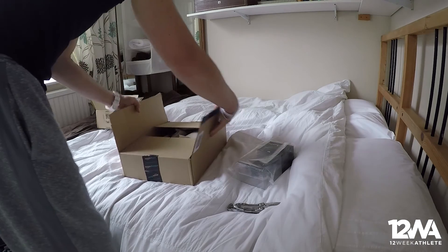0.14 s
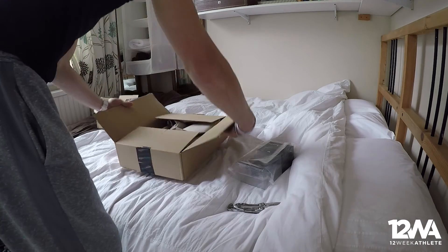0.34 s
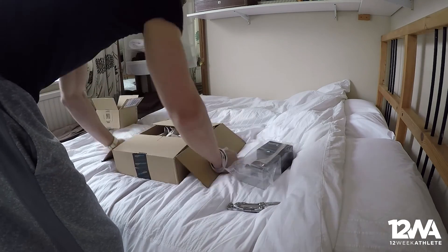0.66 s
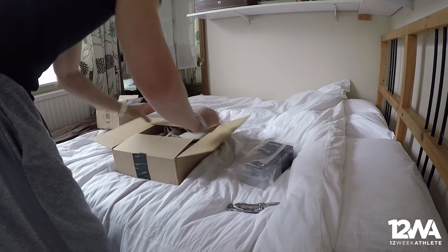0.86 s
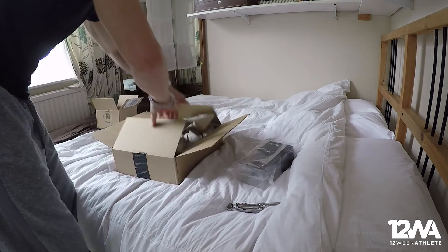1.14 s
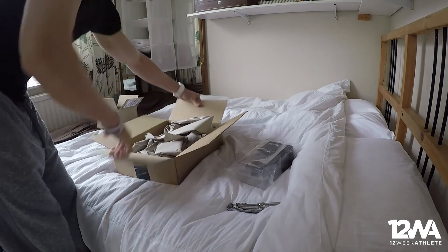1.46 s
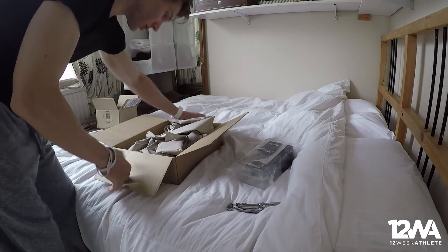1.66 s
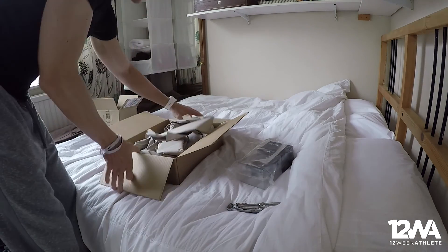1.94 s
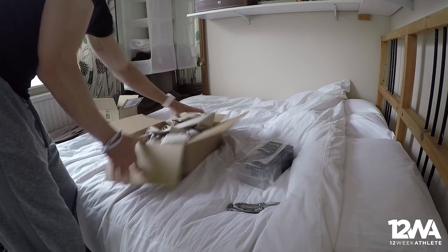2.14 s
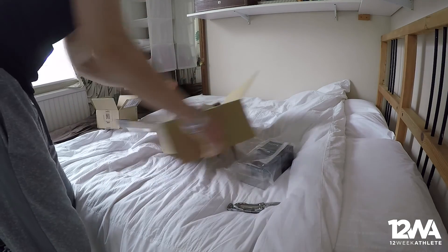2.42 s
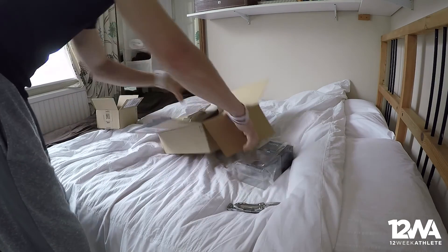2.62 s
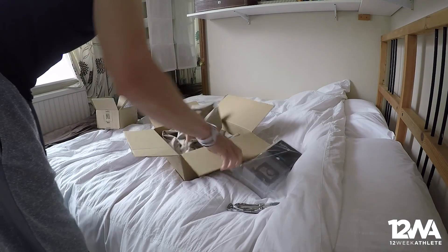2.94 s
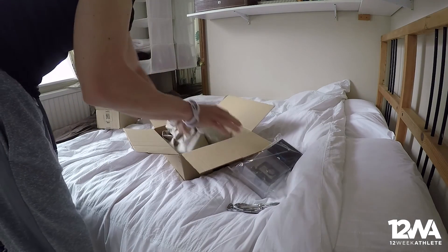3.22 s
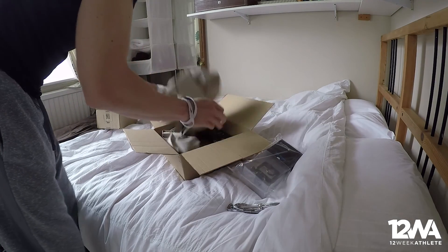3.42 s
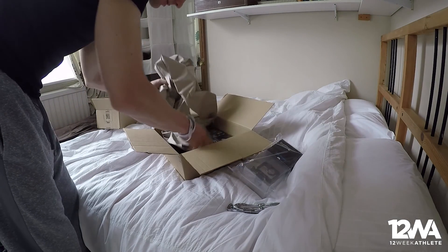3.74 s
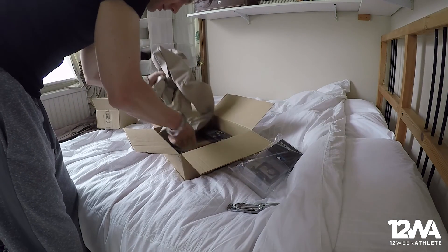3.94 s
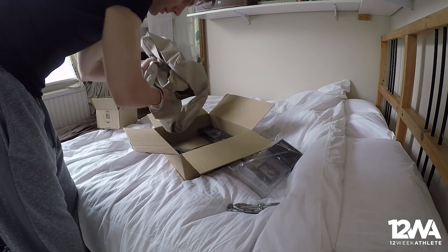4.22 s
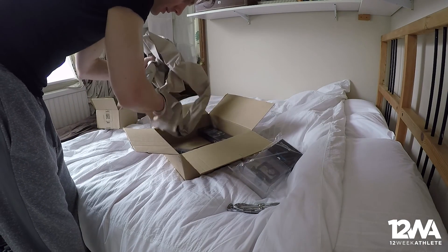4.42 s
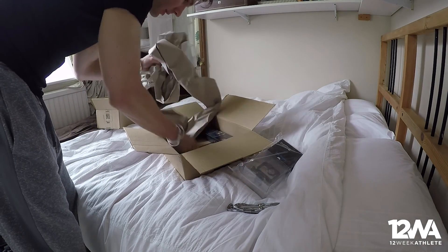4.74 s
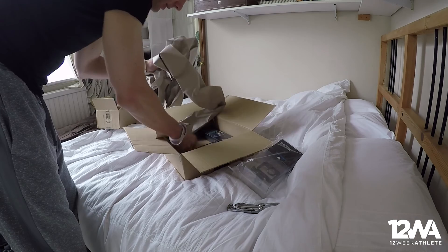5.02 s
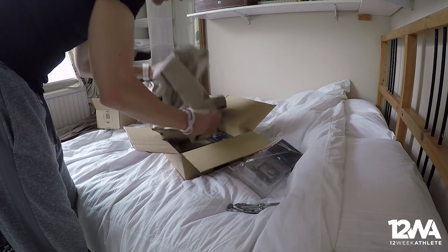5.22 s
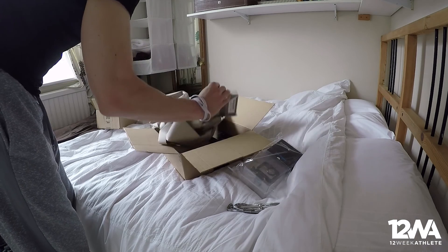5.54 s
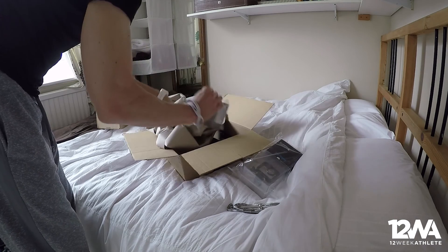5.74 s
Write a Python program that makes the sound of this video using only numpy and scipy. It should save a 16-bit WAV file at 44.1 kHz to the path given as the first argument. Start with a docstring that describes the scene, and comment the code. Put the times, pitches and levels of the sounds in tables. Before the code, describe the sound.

A cardboard box is opened on a bed in a quiet small bedroom, heard close and in mono with short, damped reflections. At about 0.15 s a flap knocks with a snap and a deep, soft mattress thump. From 0.4 to 0.8 s a flap scrapes dryly, with brief high squeaks and one lower creak. Between 1.0 and 2.3 s hollow knocks, snaps and gritty slides come irregularly, over low rumbling shoves and bounces. Lighter bumps follow from 2.4 s. Around 2.7 s stiff packing paper starts to crunch, densest and loudest near 3.1 s, with another burst around 3.5 s. It thins, then sharp creases pop from 4.0 to 4.4 s; box knocks and a low bump come near 4.75 s. A strong crackle burst at 5.3 to 5.4 s leads into continuing rustle to the end. Faint air, hiss and a thin steady high whine remain throughout.

```python
"""Opening a box and pulling out packing paper

A cardboard box is opened on a bed in a small bedroom: sliding flaps hiss, squeak, snap and knock.
Then crumpled paper crackles: tiny ringing grains come in bursts, mixed with filtered sliding noise.
Knocks are decaying tones and noise; shoves and bounces on the mattress make a low rumble.
Filtered noise and three steady high tones add the quiet room air, a faint hiss and a whine."""
import sys
import numpy as np
from scipy import signal
from scipy.fft import rfft, irfft
from scipy.io import wavfile
from scipy.ndimage import uniform_filter1d

SR = 44100
rng = np.random.default_rng(int(sys.argv[2]) if len(sys.argv) > 2 else 0)


def store_wav(level_fs):
    """Save 16-bit WAV to argv[1]."""
    pcm = np.round(np.clip(np.atleast_2d(level_fs), -1, 1) * 32767)
    wavfile.write(sys.argv[1], SR, pcm.T.astype(np.int16))


N = 258911  # length in samples


def from_db(db):
    """Turn decibels into a gain."""
    return 10 ** (np.asarray(db) / 20)


def rms_one(x):
    """Scale a sound to an average (rms) level of one."""
    return x / np.sqrt(np.mean(x ** 2) + 1e-20)


def decay(t, t60_s):
    """Gain that falls by 60 dB in t60_s."""
    return from_db(-60 * t / t60_s)


def band(x, low_hz, high_hz, order=3):
    """Keep only the pitches between two limits (Butterworth filter)."""
    sos = signal.butter(order, [low_hz, high_hz], "band", fs=SR, output="sos")
    return signal.sosfilt(sos, x + 1e-18)


def colour(x, points):
    """Shape a sound's spectrum through (pitch_hz, level_db) points, without sound ahead of its cause."""
    size = 16384
    hz, db = np.transpose(points)
    bins_hz = np.arange(size // 2 + 1) * SR / size
    log_gain = np.log(from_db(np.interp(np.log(bins_hz + 1), np.log(hz), db)))
    # folding the cepstrum makes the filter minimum-phase
    cepstrum = irfft(log_gain)[:size // 2]
    cepstrum[1:] *= 2
    response = irfft(np.exp(rfft(cepstrum, size)))
    return signal.fftconvolve(x, response)[:len(x)]


def drift(rate):
    """Random wandering around zero, joining `rate` new random values per second by straight lines."""
    knots = rng.standard_normal(N // 20)
    return np.interp(np.arange(N) / SR * rate, np.arange(len(knots)), knots)


def ring(x, hz, t60_s):
    """Resonator: a unit click starts a decaying sine of height one."""
    radius = from_db(-60 / (max(t60_s, 1e-4) * SR))
    turn = 2 * np.pi * hz / SR
    return signal.lfilter([0, np.sin(turn)], [1, -2 * radius * np.cos(turn), radius * radius], x + 1e-18)


def add(track, s, sound):
    """Mix a sound into a track at time s."""
    start = max(round(s * SR), 0)
    track[start:start + len(sound)] += sound[:max(N - start, 0)]


def stroke(start_s, rise_s, hold_s, release_db_per_s):
    """Gain of one movement: it swells, holds and dies away."""
    t = np.arange(N) / SR - start_s
    swell = np.clip(t / max(rise_s, 1e-3), 0, 1)
    fall_db = np.clip((t - rise_s - hold_s) * release_db_per_s, 0, 120)
    # a 16 dB swell, with a short fade-in over its first quarter
    return np.minimum(4 * swell, 1) * from_db(16 * (swell - 1) - fall_db)


def movements(rows, release_db_per_s):
    """Overlapping movements add in power: gains of their main sound and of the one that goes with it."""
    main, second = np.zeros(N), np.zeros(N)
    for start_s, rise_s, hold_s, level_db, relative_db in rows:
        power = (from_db(level_db) * stroke(start_s, rise_s, hold_s, release_db_per_s)) ** 2
        main += power
        second += power * from_db(relative_db) ** 2
    return np.sqrt(main), np.sqrt(second)


def grains(per_s, spread_db, cycles):
    """Tiny buckles and slips at random times; each rings a facet of its own size for a few cycles."""
    at = np.flatnonzero(rng.random(N) < per_s / SR)
    size, pitch, phase = rng.random((N, 3))[at].T[:, :, None]
    hz = 900 * (14000 / 900) ** pitch
    age = np.arange(256)  # samples since the grain began
    turns = hz * age / SR
    # random sizes; short rings start higher, so all pitches carry alike
    height = from_db(spread_db * np.minimum(-np.log(1 - size), 4)) * hz
    waves = height * np.sin(2 * np.pi * (turns + phase)) * decay(turns, cycles)
    return rms_one(np.bincount((at[:, None] + age).ravel(), waves.ravel(), N)[:N])


def friction(crackle, grain_db, spectrum, main, hollow, hiss):
    """Rubbing in three registers: mid-pitched crackle, low hollow flexing and the smoother hiss of fibres."""
    slide = rng.standard_normal(N)
    grain = from_db(grain_db) * crackle
    coarse = colour(slide + grain, spectrum)
    fine = colour(slide + from_db(-6.5) * grain, spectrum)
    middle = main * rms_one(band(coarse, 850, 7210, order=5))
    low = hollow * rms_one(band(coarse, 192, 750))
    high = hiss * rms_one(band(fine, 7150, 0.48 * SR, order=5))
    return middle + low + high


def flaps(rub, hiss):
    """Cardboard slides with a fine, uneven stick and slip; the panels drum along."""
    # tone of rubbed cardboard: pitch_hz, level_db (relative)
    card_colour = [(250, 3.5), (340, 2.5), (700, -2), (1000, -6.5), (1600, -7), (2200, -2.5), (2850, -0.5),
                   (3300, -5.5), (4200, -3.5), (5200, -6), (7000, -15), (9000, -17.5), (13000, -16),
                   (15500, -18)]
    # the drumming is -52 dB at a rub of -48 dB and follows 0.61 of the rub's swing in dB
    hollow = from_db(-52) * (rub / from_db(-48)) ** 0.61
    slips = grains(per_s=3000, spread_db=3.2, cycles=6) * from_db(4.5 * drift(90))
    return friction(slips, -4.9, card_colour, rub, hollow, hiss)


def avalanches():
    """One crease sets off its neighbours: activity jumps at random moments and dies down; mean one."""
    per_s, decay_s, spread_db = 110, 0.005, 4.5
    starts = rng.random(N) < per_s / SR
    sizes = from_db(spread_db * np.clip(rng.standard_normal(N), -2, 2))
    activity = signal.lfilter([1], [1, -np.exp(-1 / (decay_s * SR))], starts * sizes)
    return activity / activity.mean()


def paper(crumple, hiss):
    """Creases buckle in little avalanches, more of them the harder the paper is worked; the sheet flexes."""
    # tone of rubbed paper: pitch_hz, level_db (relative)
    paper_colour = [(200, 0), (280, 11.5), (340, 0), (390, 5.5), (620, 2), (900, -4.5), (1200, -6.5),
                    (1600, -9), (1760, -4), (2900, -2), (3350, -7), (4200, -4), (5100, -5.5), (6500, -13),
                    (8800, -23), (15500, -25.5)]
    work = crumple / from_db(-40)  # one at a crumpling of -40 dB
    effort = np.sqrt(work) + .25
    buckles_per_s = 1300 * effort * (avalanches() + .15)
    buckles = grains(buckles_per_s, spread_db=-1.1, cycles=2.6) / np.sqrt(effort)
    # the sheet is -45.5 dB when work is one and follows 0.82 of its swing in dB
    sheet = from_db(-45.5) * work ** 0.82
    return friction(buckles, -2.5, paper_colour, crumple, sheet, hiss)


def snaps():
    """A crease pops through: a crack, a ringing facet and a brief after-crackle."""
    # sharp snaps of creases and flap edges, levels before the shared trims below:
    # start_s, level_db, ring_hz, treble_db (against the crack), after_crackle_db (against the first burst)
    snap_rows = [(0.1141, -33.5, 2200, -15, -11), (0.1448, -27, 2800, -11, -11),
                 (1.0133, -32, 3400, -6, -13), (1.3371, -29.5, 2830, -14, -7.5),
                 (1.4228, -32, 1950, -12, -3.5), (1.4876, -24, 2720, -14, -8.5),
                 (1.946, -29, 3020, -17, -9), (1.9834, -35, 2820, 4, -26), (2.1738, -43, 2510, -16, -2),
                 (2.2865, -40.5, 4430, -14, -10), (2.431, -36, 2640, -17, -16),
                 (2.453, -32, 2610, -18, -18), (2.602, -30.5, 2870, -9, -9), (3.1037, -22, 2160, -9, -15),
                 (3.1548, -35, 2880, -13, -15), (3.9735, -26, 1980, -16, -18),
                 (3.9861, -22, 4340, -31, -13), (4.1097, -23, 2840, -17, -8), (4.2741, -31, 2970, -17, -2),
                 (4.3414, -26, 2950, -16, -10), (4.662, -30.5, 2520, -22, -5),
                 (4.7526, -35, 2320, -16, -2.5), (4.9078, -35, 2910, -21, -3), (4.993, -31, 2880, -19, -7),
                 (5.0538, -37.5, 1920, -21, -5), (5.327, -23.5, 5040, -5, -9), (5.375, -29, 5070, -5, -1),
                 (5.4013, -22.5, 2720, -16, -4.5), (5.7113, -26, 3170, -15, -7.5)]
    out = np.zeros(N)
    t = np.arange(SR // 8) / SR
    first = decay(t, .012)
    for start_s, level_db, ring_hz, treble_db, after_db in snap_rows:
        noise = rng.standard_normal(len(t))
        body = rms_one(band(noise, 1630, 4730, order=2))
        facet = from_db(1.0) * rms_one(ring(noise, ring_hz, 0.0035))
        treble = from_db(treble_db) * rms_one(band(noise, 6300, 12000, order=2))
        crack = rms_one(body + facet + treble)
        after = from_db(after_db + 4.5) * decay(t, 0.037)
        add(out, start_s, from_db(level_db - 6.0) * crack * (first + after))
    return out


def squeaks():
    """Fast stick and slip of cardboard on cardboard: a wavering, gliding tone with a weak octave."""
    # squeaks, level before the shared trim below:
    # start_s, length_s, start_hz, end_hz, level_db, roughness (0-1)
    squeak_rows = [(0.60, .06, 3100, 3450, -47, .45), (0.682, .062, 3950, 3750, -42, .25),
                   (0.695, .026, 4050, 4450, -40, .4), (0.698, .036, 4000, 3400, -37.5, .85),
                   (0.776, .026, 620, 740, -38.5, .7), (1.592, .04, 3400, 3750, -40, .9)]
    out = np.zeros(N)
    for start_s, length_s, start_hz, end_hz, level_db, rough in squeak_rows:
        size = int(length_s * SR)
        hz = np.linspace(start_hz, end_hz, size) * (1 + .2 * rough * drift(1800)[:size])
        phase = 2 * np.pi * np.cumsum(hz) / SR
        tone = np.sin(phase) + from_db(-7 - 20 * rough) * np.sin(2 * phase)
        tone = tone * from_db(6 * rough * drift(600)[:size])
        fade = np.sin(np.linspace(0, np.pi, size))
        add(out, start_s, from_db(level_db - 2.0) * rms_one(tone) * fade)
    return out


def panels(contacts):
    """The box's panels ring to any contact, neighbouring modes in opposite phase."""
    # ringing pitches of the cardboard panels: pitch_hz, level_db (relative), t60_s
    box_modes = [(386, 6.5, 0.022), (450, -7.5, 0.36), (557, -11, 0.06), (655, -4, 0.0093),
                 (800, -42, 0.12), (990, -21, 0.008), (1056, 2, 0.016), (1400, -1, 0.044)]
    out = np.zeros(N)
    for k, (hz, level_db, t60_s) in enumerate(box_modes):
        # long rings are scaled down, so they do not gain level by lasting
        gain = (-1) ** k * from_db(level_db) * 2 / np.sqrt(t60_s * SR)
        out += gain * ring(contacts, hz, t60_s)
    return out


def knocks():
    """A flap thuds at its own pitch with a weak overtone; the contact clacks and rings the panels."""
    # knocks on flaps and walls, levels before the shared trims below:
    # start_s, swing_db, panel_hz, thud_db, clack_hz, clack_db
    knock_rows = [(0.128, -28, 139, -33, 395, -35), (0.145, -24, 134, -24, 485, -35.5),
                  (0.338, -39.5, 240, -32, 464, -68), (0.485, -45, 178, -20, 530, -50),
                  (1.025, -23, 142, -25, 690, -39), (1.089, -30.5, 176, -38, 560, -52),
                  (1.197, -23, 186, -34, 560, -36.5), (1.338, -29, 160, -31, 750, -33.5),
                  (1.423, -28, 212, -35, 710, -31.5), (1.485, -24, 132, -37, 930, -32.5),
                  (1.525, -30.5, 225, -35, 842, -51), (1.65, -31, 272, -45, 497, -35.5),
                  (1.771, -32.5, 199, -45, 607, -55), (1.982, -29.5, 181, -19, 700, -30.5),
                  (2.195, -22.5, 193, -45, 330, -41), (2.666, -30.5, 256, -27, 473, -37),
                  (2.812, -27.5, 151, -39, 484, -32), (2.945, -29, 133, -37, 645, -36),
                  (3.447, -33, 276, -35, 580, -33), (4.666, -34, 186, -31, 458, -42.5),
                  (4.766, -24.5, 190, -22, 580, -40), (4.903, -36.5, 269, -56, 454, -41.5),
                  (5.294, -39, 285, -38, 604, -47)]
    out, contacts = np.zeros(N), np.zeros(N)
    t = np.arange(SR // 4) / SR
    for start_s, swing_db, panel_hz, thud_db, clack_hz, clack_db in knock_rows:
        phase = 2 * np.pi * panel_hz * t
        swing = np.sin(phase) + from_db(-28.5) * np.sin(1.39 * phase)
        swing = swing * decay(t, .032) * (1 - np.exp(-t / 0.0025))
        thud = rms_one(band(rng.standard_normal(len(t)), 65, 300, order=2)) * decay(t, 0.065)
        clack = np.sin(2 * np.pi * clack_hz * t) * decay(t, 0.016)
        knock = from_db(swing_db + 11.5) * swing + from_db(thud_db - 12.0) * thud
        add(out, start_s, knock + from_db(clack_db + 6.5) * clack)
        add(contacts, start_s, from_db(clack_db) * rng.standard_normal(len(t)) * decay(t, 0.015))
    return out + from_db(-0.5) * panels(contacts)


def scuffs():
    """A wall catches and slips unevenly, sounding around its own pitch and in the panels."""
    # a flap or wall juddering along the bedding or the paper: start_s, length_s, level_db, pitch_hz
    scuff_rows = [(0.0, 0.021, -39, 366), (0.141, 0.0174, -36.5, 700), (0.525, 0.058, -43, 600),
                  (1.341, 0.021, -43, 710), (1.622, 0.015, -45, 450), (2.195, 0.015, -37, 297),
                  (2.659, 0.11, -42.5, 480), (3.007, 0.033, -41, 614), (3.091, 0.101, -39.5, 390),
                  (3.118, 0.064, -42.5, 774), (3.211, 0.017, -47, 413.6), (3.441, 0.042, -45, 434),
                  (4.766, 0.0214, -40.5, 260), (5.199, 0.13, -46, 485), (5.227, 0.043, -37.5, 182)]
    out, contacts = np.zeros(N), np.zeros(N)
    for start_s, length_s, level_db, hz in scuff_rows:
        size = int(length_s * SR)
        slips = (rng.standard_normal(N) * from_db(4.8 * drift(122.0)))[:size]
        gain = from_db(level_db) * signal.windows.tukey(size, .4)
        add(out, start_s, gain * rms_one(band(slips, 0.69 * hz, 1.076 * hz, order=2)))
        add(contacts, start_s, gain * rms_one(slips))
    return out + from_db(-29.0) * panels(contacts)


def rumble(rubbing):
    """The box shifts and bounces on the mattress; shoves and rubbing make its walls shudder."""
    # the box is shoved or tipped: start_s, rise_s, hold_s, rumble_db, shudder_db (against the rumble)
    shove_rows = [(0.27, 0.015, 0.018, -43.5, -2), (0.47, 0.032, 0.081, -38, -4),
                  (1.0, 0.011, 0.075, -44.5, 1), (1.17, 0.018, 0.36, -39, -9),
                  (1.57, 0.029, 0.033, -39, -5), (1.76, 0.02, 0.031, -43.5, -20),
                  (1.95, 0.019, .03, -46.5, 5.5), (2.18, 0.028, 0.2, -50, -5.5),
                  (2.63, 0.046, 0.025, -39, -6), (2.72, 0.037, 0.066, -51, 11),
                  (2.92, .04, 0.14, -45.5, -6), (3.38, 0.065, 0.14, -40.5, -8),
                  (4.05, 0.033, 0.32, -51, -13), (4.42, 0.057, 0.15, -45.5, -10),
                  (4.63, 0.11, 0.057, -44.5, -0.5), (4.88, 0.019, 0.022, -45, -12),
                  (5.28, 0.027, 0.034, -38.5, -4.5)]
    # the whole box bouncing on the bed: start_s, pitch_hz, height_db, t60_s
    bounce_rows = [(0.0, 72, -23.5, .38), (0.15, 70, -13, .25), (0.15, 132, -15.5, .18),
                   (1.240, 54, -25.5, .45), (1.49, 57, -32, .3), (2.226, 52, -24.5, .34),
                   (4.68, 72, -29, .4), (4.77, 72, -28, .2)]
    # tone of the rumble: pitch_hz, level_db (relative)
    rumble_colour = [(12, -65), (22, -1), (38, 2), (56, 2), (74, 13.5), (86, 4), (105, -36), (135, -11.5),
                     (170, -25), (290, -100)]
    stir_db, stir_shudder_db = -53, -5.5  # the bed never quite rests; shudder against the stir
    shift, shudder = movements(shove_rows, release_db_per_s=128)
    shift = np.hypot(shift, from_db(stir_db))
    shudder = np.hypot(shudder, from_db(stir_db + stir_shudder_db))
    shudder = np.hypot(shudder, from_db(-12) * rubbing)
    low = colour(rng.standard_normal(N), rumble_colour)
    # even out the noise's own swells, so the movements set the level
    low = low / np.sqrt(uniform_filter1d(low ** 2, SR // 12) + 1e-20)
    out = shift * low + shudder * rms_one(band(rng.standard_normal(N), 83.5, 208.4))
    t = np.arange(SR // 2) / SR
    for start_s, hz, height_db, t60_s in bounce_rows:
        bounce = np.sin(2 * np.pi * hz * t) * decay(t, t60_s) * (1 - np.exp(-t / 0.00094))
        add(out, start_s, -from_db(height_db) * bounce)
    return out


def bedroom(x, wet_db, count=4):
    """Direct sound and short tails whose treble the bedding soaks up; echo paths change as the source moves."""
    t = np.arange(SR // 3) / SR
    white = rng.standard_normal((count, len(t)))
    body = band(white, 103, 5660, order=1) * decay(t, 0.19)
    treble = 1.94 * band(white, 6000, 15400, order=1) * decay(t, 0.096)
    tails = (body + treble) * (t > .003)  # echoes start after 3 ms
    # the sound wanders between the tails at a steady total power
    shares = np.array([drift(14) for _ in range(count)])
    shares = shares / np.linalg.norm(shares, axis=0)
    wet = np.zeros(N)
    for share, tail in zip(shares, tails):
        wet += signal.fftconvolve(x * share, tail / np.linalg.norm(tail))[:N]
    return (x + from_db(wet_db) * wet) / np.sqrt(1 + from_db(wet_db) ** 2)


def background():
    """Quiet room air, microphone hiss and a thin electronic whine: filtered noise and steady sines."""
    # tone of the air and hiss: pitch_hz, level_db (relative)
    floor_colour = [(15, 14), (28, -8), (60, 1), (120, -0.5), (250, -15), (500, -13), (1500, -20),
                    (5500, -24), (9000, -31), (15500, -40)]
    # electronic whine: pitch_hz, level_db (rms)
    whine_rows = [(5486, -91), (6234, -79), (12468, -74)]
    t = np.arange(N) / SR
    whine = sum(np.sqrt(2) * from_db(db) * np.sin(2 * np.pi * hz * t) for hz, db in whine_rows)
    return from_db(-55) * rms_one(colour(rng.standard_normal(N), floor_colour)) + whine


def scene():
    """Box and paper in the bedroom, one channel."""
    # a flap slides over cardboard or bedding:
    # start_s, rise_s, hold_s, level_db, fine_hiss_db (against the level)
    slide_rows = [(0.0, .005, .07, -60, -4), (0.11, .03, .13, -59, -10), (0.43, .06, .04, -48, -6),
                  (0.50, .04, .03, -42, -16), (0.66, .04, .025, -45, -10), (0.74, .035, .02, -47, -16),
                  (1.005, .01, .03, -48, -11), (1.05, .05, .11, -49, -12), (1.11, .04, .06, -54, 0),
                  (1.22, .03, .07, -55, -10), (1.33, .02, .035, -49, -7), (1.481, .013, .012, -40, -4),
                  (1.53, .075, .05, -46, -13), (1.67, .06, .025, -53, -3), (1.80, .035, .018, -43, -11),
                  (1.87, .035, .03, -49, -13), (1.922, .022, .018, -39.5, -16), (2.0, .03, .36, -60, -9),
                  (2.475, .02, .1, -55, -7), (2.428, .003, .006, -44.5, -5)]
    # hands rest on the box and brush it lightly, letting go once: start_s, length_s
    grip_rows = [(0.0, 0.64), (1.05, 2.04)]
    # the paper is pushed, gathered or pulled:
    # start_s, rise_s, hold_s, level_db, sliding_hiss_db (against the level)
    pull_rows = [(2.65, 0.0077, 0.3, -49.5, -9), (2.75, 0.11, 0.42, -38, -12),
                 (3.06, 0.027, 0.081, -35, -10), (3.17, 0.035, 0.3, -40.5, -15.5),
                 (3.42, 0.018, 0.038, -40.5, -6.5), (3.515, 0.028, 0.019, -37, -9.5),
                 (3.60, 0.068, 0.28, -53.5, -13), (3.68, 0.047, 0.1, -49.5, -9.5),
                 (3.86, 0.019, 0.0099, -44.5, -11), (3.965, 0.0058, 0.21, -42.5, -10.5),
                 (4.24, 0.014, 0.11, -45.5, -9.5), (4.55, 0.024, .012, -56, -3),
                 (4.62, 0.035, .045, -45.5, -13.5), (4.72, 0.031, 0.18, -51, -11),
                 (5.17, 0.1, 0.059, -44.5, -8.5), (5.29, 0.051, 0.082, -37.5, -11),
                 (5.43, .03, 0.51, -47.5, -10.5), (5.555, 0.019, 0.09, -47.5, -9),
                 (5.65, 0.021, 0.24, -45.5, -11)]
    grips = [(start_s, .01, length_s, -62, -3) for start_s, length_s in grip_rows]
    settling = [(3.6, .01, N / SR, -55, -14)]  # from here on the lifted paper keeps settling
    rub, rub_hiss = movements(slide_rows + grips, release_db_per_s=316)
    crumple, paper_hiss = movements(pull_rows + settling, release_db_per_s=241)
    rubbing = flaps(rub, rub_hiss) + paper(crumple, paper_hiss)
    rustle = bedroom(rubbing + squeaks(), wet_db=-9.0) + bedroom(snaps(), wet_db=0)
    bumps = bedroom(knocks() + scuffs(), wet_db=-0.5)
    return (rustle + bumps + rumble(np.hypot(rub, crumple)) + background())[None]


def record(dry):
    """The recorder cuts the treble steeply above 15.4 kHz."""
    return signal.sosfilt(signal.ellip(12, .1, 90, 15400, fs=SR, output="sos"), dry)


dry = scene()
out = record(dry)
store_wav(out)
```